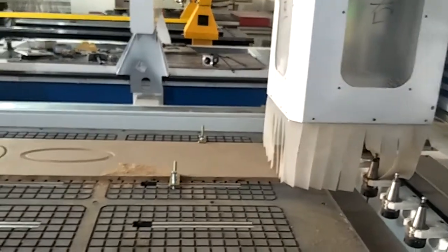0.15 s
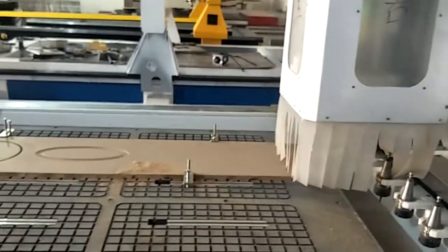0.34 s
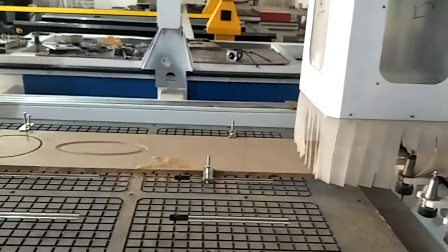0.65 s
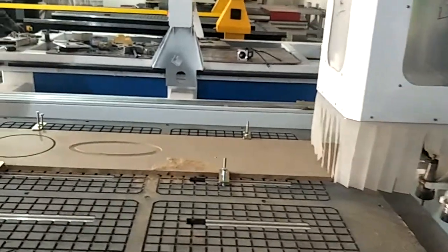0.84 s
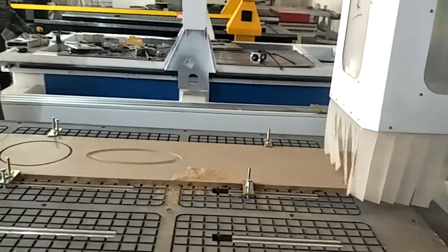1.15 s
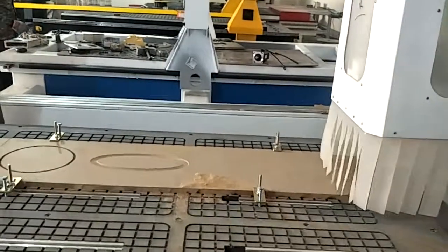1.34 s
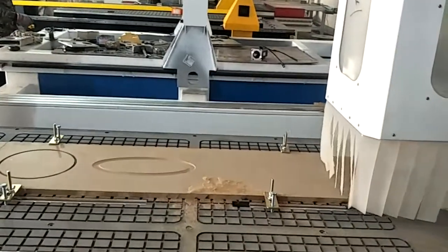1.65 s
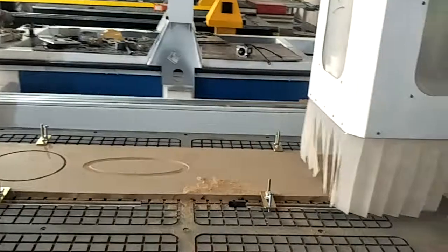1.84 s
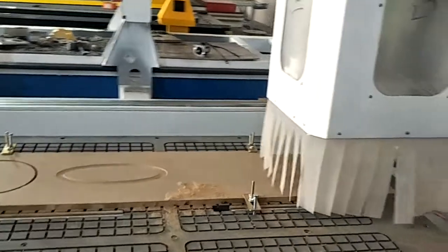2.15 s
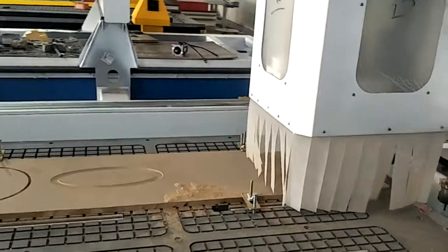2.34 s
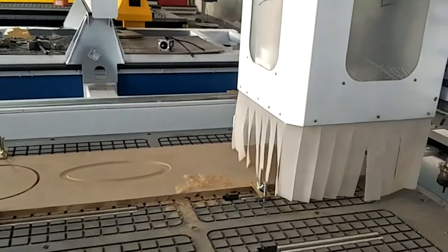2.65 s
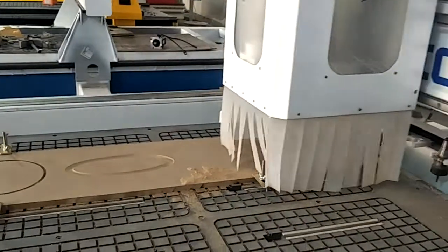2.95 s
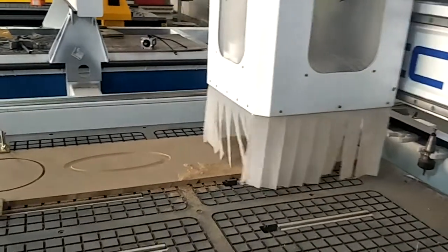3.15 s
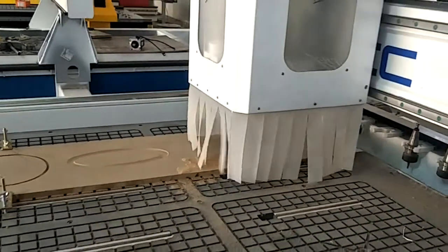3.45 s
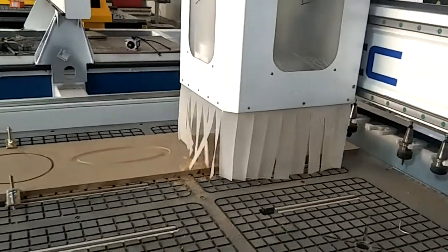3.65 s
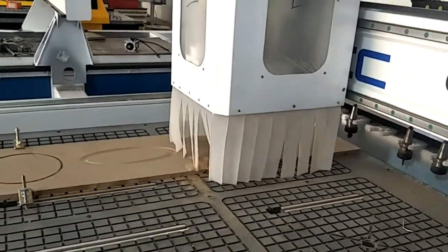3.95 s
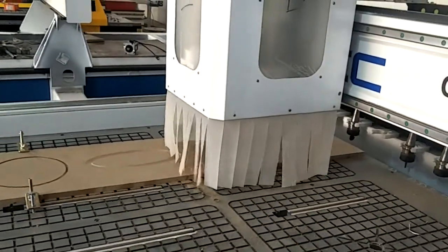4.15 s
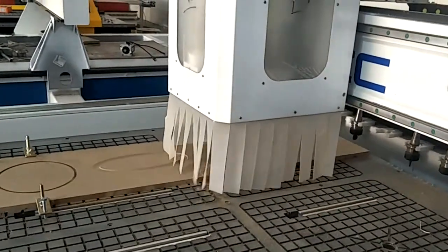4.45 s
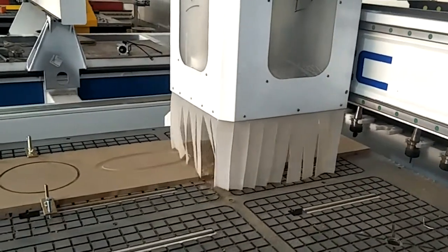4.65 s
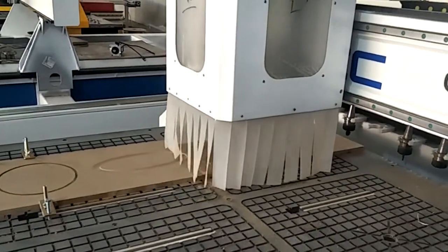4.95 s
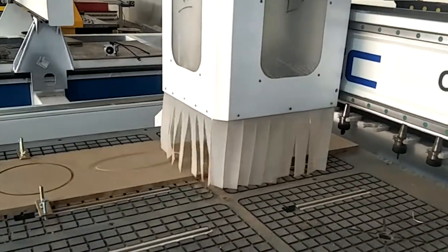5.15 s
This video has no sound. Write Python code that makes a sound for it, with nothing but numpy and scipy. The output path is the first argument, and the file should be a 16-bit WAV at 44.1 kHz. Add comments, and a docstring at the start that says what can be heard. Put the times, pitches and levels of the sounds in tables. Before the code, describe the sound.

From 0 s a router spindle is already running up in a reverberant workshop. A low hum climbs from about 140 to 285 Hz by 5.3 s, while a piercing, slightly gritty whine rises with it from about 4.5 to 9 kHz. Both swell and fade as they pass through resonances; the whine leans right in the later part. Drive electronics add a wavering tone sliding from 800 to 1400 Hz, steady after 2.5 s, a faint very high switching tone, and thin beat tones. Low rumble and airy bearing rush sit behind, the rumble fuller from about 2 s, with faint distant machine tones. At 2.9 to 3.1 s four quick gantry knocks clatter, the third with the hardest metallic clang. From 4.4 s a feed motor sings softly near 3.3 kHz, with dull thuds at 4.6, 4.8, 4.9 and a stronger one at 5.2 s. The spindle is still rising at the end.

```python
"""A hum and a piercing whine rise together as a router spindle runs up in a workshop.
The unbalanced shaft hums, 32 rotor slots whine, and both swell as they sweep through resonances.
The drive electronics add tones of their own and beat tones around the whine; air and machinery rush behind.
The hall answers spindle, beats and knocks with a different tail at each of two microphone ports.
Later the gantry knocks, and a feed motor sings as it creeps."""
import sys
import numpy as np
from scipy import signal
from scipy.io import wavfile
from scipy.ndimage import uniform_filter1d, map_coordinates

SR = 44100
rng = np.random.default_rng(int(sys.argv[2]) if len(sys.argv) > 2 else 0)


def store_wav(level_fs):
    """Save 16-bit WAV to argv[1]."""
    pcm = np.round(np.clip(np.atleast_2d(level_fs), -1, 1) * 32767)
    wavfile.write(sys.argv[1], SR, pcm.T.astype(np.int16))


def ratio(d):
    """dB to gain"""
    e = np.asarray(d, float) / 20
    return 10 ** e


N = 233465  # length in samples


def unit(x):
    """Normalisation: scales a signal to an rms of 1."""
    return x / np.sqrt(np.mean(x ** 2) + 1e-20)


def along(points, hz, order=1):
    """Spectral envelope: interpolates one column of (f/Hz, value, ..) on a logarithmic frequency axis."""
    columns = np.transpose(points)
    return np.interp(np.log(np.abs(hz) + 1), np.log(columns[0] + 1), columns[order])


def curves(rows):
    """Time envelope: one value per sample for each column after t/s."""
    s, *columns = np.transpose(rows)
    return [np.interp(np.arange(N) / SR, s, column) for column in columns]


def wobble(rate):
    """Band-limited random modulation: a spline through random knots, rate of them a second."""
    knots = rng.standard_normal(int(N * rate / SR) + 4)
    return map_coordinates(knots, [np.arange(N) * rate / SR])


def tone(hz, db, pan_db=0):
    """Frequency modulation: the phase of a sine integrates its frequency; db is rms, pan_db left over right."""
    cycles = np.cumsum(hz) / SR + rng.random()
    wave = np.sqrt(2) * ratio(db) * np.sin(2 * np.pi * cycles)
    return wave * ratio([[pan_db / 2], [-pan_db / 2]])


def peaks(rows, hz, order=2):
    """Modal superposition: steep resonances add with their phase, so neighbours cancel between peaks."""
    total = 0
    for row in rows:
        detuning = 1 + 2j * (hz - row[0]) / row[1]
        total = total + ratio(row[order]) / (detuning * np.abs(detuning))
    return np.abs(total)


# machine frame resonances: f/Hz, half-power width/Hz, level/dB (over the flat part, added as power)
FRAME_MODES = [(342.4, 26, 9), (428, 8.3, 7), (547, 29, -2.5), (795, 55, 9.5), (964, 43, 0), (1962, 12, 5),
               (2117, 76, 2.5)]


def frame(hz):
    """Structural resonance: a flat gain with the power of each frame mode added on top."""
    power = sum(ratio(db) ** 2 / (1 + (2 * (hz - centre) / width) ** 2) for centre, width, db in FRAME_MODES)
    return np.sqrt(1 + power)


# run-up of the shaft: t/s, f/Hz (turns a second)
SHAFT_SPEED = [(0.0, 141.4), (0.18, 149.1), (0.6, 166.7), (1.12, 185.8), (1.4, 194.5), (1.68, 202.3),
               (2.18, 213.4), (2.6, 221.3), (3.7, 242.3), (4.2, 254), (4.7, 266.4), (5.0, 274.8),
               (5.29, 284.4)]
# standing waves of the workshop that the hum sweeps through: f/Hz, width/Hz (at -6 dB), level/dB
ROOM_MODES = [(145.8, 3.8, -25), (165.3, 7, -17), (177, 2.6, -29), (173.3, 6.2, -10.5), (179.4, 3.6, -13),
              (184.85, 6.1, -10.5), (190.4, 4.4, -17.5), (200.3, 5.5, -16.5), (206.14, 7.6, -11),
              (212, 8, -17.5), (225.94, 7.3, -13), (232.2, 4.45, -20), (237.9, 6.5, -17),
              (254.25, 10.2, -17), (269.94, 7.4, -16.5), (281.5, 12, -23.5)]
# bearing seat resonances: f/Hz, width/Hz (at -6 dB), level/dB
SEAT_MODES = [(1700, 340, -64), (1913, 38, -37), (2010, 34, -39.5), (2040, 55, -33.5), (2123, 39, -27.5),
              (2252, 25, -32), (2330, 130, -42), (2500, 34, -36.5), (2596, 40, -36.5)]
# shaft orders: multiples of the shaft speed
ORDERS = [.42, 2, 3, 3.999]
# the same orders: level/dB (before frame and wobble)
ORDER_LEVELS = [-45, -45.5, -50.5, -49.5]
# housing resonances that the slot whine sweeps through: f/Hz, width/Hz (at -6 dB), left level/dB, right level/dB
SHELL_MODES = [(4553, 160, -17.5, -16), (4793, 93, -20.5, -22.5), (4952, 79, -24, -13.5),
               (5110, 84, -14, -17.5), (5394, 90, -30, -15.5), (5627, 210, -23.5, -17),
               (5910, 270, -31.5, -22), (6260, 630, -29.5, -26), (6660, 170, -32.5, -22.5),
               (6827, 67, -33.5, -16), (6913, 28, -29.5, -12.5), (7024, 82, -36, -19.5),
               (7240, 344, -30.5, -21), (7690, 160, -39.5, -26), (7990, 330, -30, -24.5),
               (8214, 144, -33.5, -22.5), (8428, 215, -26, -20.5), (8610, 120, -33.5, -31),
               (8870, 230, -33, -27), (9070, 25, -35.5, -32.5)]
SLOTS, BEARING = 32, 9.3  # cycles per turn
HISS_DB, HISS_HZ = -21.5, 1105  # nominal depth under the whine and spread to either side


def spindle():
    """Order analysis: hum, shaft orders, bearing tone and slot whine are multiples of one shaft speed."""
    shaft, = curves(SHAFT_SPEED)
    hum = peaks(ROOM_MODES, shaft) * tone(shaft, 0, pan_db=0.8)
    bearing = peaks(SEAT_MODES, BEARING * shaft) * tone(BEARING * shaft, 0, pan_db=3.0)
    orders = 0
    for multiple, db in zip(ORDERS, ORDER_LEVELS):
        orders = orders + frame(multiple * shaft) * tone(multiple * shaft, db + 4 * wobble(8))
    slot_hz = SLOTS * shaft
    reach = np.array([peaks(SHELL_MODES, slot_hz), peaks(SHELL_MODES, slot_hz, order=3)])  # left, right
    hiss = ratio(HISS_DB) * wobble(2 * HISS_HZ)  # modulation spreads noise around the whine
    whine = reach * tone(slot_hz, 0) * (1 + hiss)
    return hum + bearing + orders + whine


# drive tone that ramps up and holds: t/s, f/Hz
DRIVE_PITCH = [(0.0, 801), (0.93, 1030), (2.55, 1400), (5.29, 1399)]
# switching tone of the drive: t/s, f/Hz
SWITCH_PITCH = [(0, 11020), (.45, 11195), (1.45, 11574), (2.25, 11838), (2.55, 11929), (5.29, 11929)]
# levels before any wobble: t/s, drive tone level/dB, whine + drive level/dB, switching tone level/dB
TONE_LEVELS = [(0.0, -35.5, -34, -68), (0.6, -35, -31.5, -56), (1.2, -41, -46.5, -59), (1.8, -34, -45, -48),
               (2.6, -34.5, -37.5, -47.5), (3.3, -41, -47, -51), (3.75, -39.5, -49.5, -48),
               (4.0, -31.5, -44.5, -48), (4.45, -33.5, -44.5, -48), (4.7, -37, -46, -48),
               (5.29, -33, -39, -50)]
# weak beats: multiples of whine, drive tone, switching tone, rectifier ripple [1]
BEAT_ORDERS = [(1, -1, 0, 0), (1, 0, 0, 1), (1, 0, 0, -1), (1, 0, 0, 2), (1, 0, 0, -2), (-1, 0, 1, 0),
               (2, 1, 0, 0), (2, 0, 0, 0), (2, -1, 0, 0), (3, 0, 0, 0), (3, -1, 0, 0)]
# the same beats: level/dB (before housing and wobble), left over right/dB
BEAT_LEVELS = [(-48, -10), (-50.5, -13), (-41, -7), (-57.5, 11), (-62.5, -7.5), (-51.5, 0.5), (-51, 0),
               (-58, 7.5), (-60.5, -3), (-63, 12.5), (-61, -5)]
# how well the housing radiates the beats: f/Hz, level/dB
HOUSING_GAIN = [(3500, 4.5), (4500, -4.5), (5000, 1.5), (5600, -2), (7000, -5.5), (9000, -4), (10300, -5.5),
                (11600, 3.5), (13500, 1.5), (15700, -3.5)]
RIPPLE_HZ = 300


def drive():
    """Intermodulation: in the magnetic field the drive's tones beat with the slot whine at sums and differences."""
    whine = SLOTS * curves(SHAFT_SPEED)[0]
    (drive_hz,), (switch_hz,) = curves(DRIVE_PITCH), curves(SWITCH_PITCH)
    _, upper_db, _ = curves(TONE_LEVELS)
    sound = tone(whine + drive_hz, upper_db, pan_db=-7.5)
    for (a, b, c, d), (db, pan_db) in zip(BEAT_ORDERS, BEAT_LEVELS):
        beat = a * whine + b * drive_hz + c * switch_hz + d * RIPPLE_HZ
        audible = beat < .45 * SR  # silent near the Nyquist limit
        level = db + along(HOUSING_GAIN, beat) + 3.43 * wobble(14)
        sound = sound + audible * tone(beat, level, pan_db)
    return sound


def cabinet():
    """Interaural-type delay: the wavering drive and switching tones come from the side, right port later."""
    drive_db, _, switch_db = curves(TONE_LEVELS)
    base = tone(curves(DRIVE_PITCH)[0], drive_db + 2.5 * wobble(14), pan_db=4.0)
    switching = tone(curves(SWITCH_PITCH)[0], switch_db + 4 * wobble(5.99), pan_db=4)
    left, right = base + switching
    return np.array([left, np.roll(right, 10)])  # samples


# likeness of left and right noise: f/Hz, correlation [1]
LIKENESS = [(60, 0.9), (240, 1), (950, 0.27), (3770, 0.057), (15000, 0.04)]


def rush(gain, patchy_db):
    """Partial coherence: noise of rms 1, less alike left and right by frequency, in patches of random gain."""
    hz, _, z = signal.stft(rng.standard_normal((2, N + SR)), SR, nperseg=4096)
    field = uniform_filter1d(rng.standard_normal(z.shape[1:]), 20, 0)
    field = uniform_filter1d(field, 2, 1)
    turn = np.arccos(np.clip(along(LIKENESS, hz), -1, 1))[:, None] / 2  # splits power into mid and side
    z = z * gain(hz)[:, None] * ratio(patchy_db * unit(field))
    mid, side = signal.istft(z * [np.cos(turn), np.sin(turn)], nperseg=4096)[1][:, :N]
    return unit(np.array([mid + side, mid - side]))


# course of the background: t/s, rumble level/dB, rush level/dB (each relative, offset below)
SHOP_LEVELS = [(0.0, -41.5, -41), (0.13, -41, -43.5), (2.19, -32, -41), (2.75, -34, -40), (3.08, -34, -36),
               (3.3, -36.5, -42.5), (4.45, -35.5, -42), (4.75, -32.5, -38), (5.29, -39.5, -39)]
# spectrum of the rumble: f/Hz, relative level/dB
RUMBLE_SPECTRUM = [(25, -27.5), (50, -16.5), (80, -7), (110, -1.5), (170, -0.5), (260, -3), (400, -22),
                   (600, -53.5)]
# spectrum of the rush before the frame colours it: f/Hz, relative level/dB
RUSH_SPECTRUM = [(150, -20.5), (300, -7), (700, -5), (1200, -8.5), (1700, -9.5), (2300, -9), (3000, -14.5),
                 (4400, -19), (5200, -31.5), (6500, -30.5), (8000, -66), (15500, -90.5)]


def shop():
    """Filtered broadband noise: low rumble, and the rush of air and bearings coloured by the frame."""
    rumble_db, rush_db = curves(SHOP_LEVELS)
    rumble = rush(lambda hz: ratio(along(RUMBLE_SPECTRUM, hz)), patchy_db=2.0)
    air = rush(lambda hz: ratio(along(RUSH_SPECTRUM, hz)) * frame(hz) ** 0.79, patchy_db=1.5)
    return ratio(rumble_db + 5.0) * rumble + ratio(rush_db + 13) * air


# tones of machinery further off, before their wobble: f/Hz, level/dB
FAR_TONES = [(1505, -50), (2005, -47)]


def far_machines():
    """Narrow-band modulation: distant tones keep their place while pitch and level waver."""
    return sum(tone(hz + 4 * wobble(6), db + 5 * wobble(7)) for hz, db in FAR_TONES)


# reverberation: f/Hz, t60/s, relative level/dB
HALL_DECAY = [(148, 1, -20), (597, 0.73, 0), (1980, 0.56, -2.5), (5700, 0.45, -1.5), (12000, 0.26, 1.5)]


def hall(x):
    """Diffuse reverberation: noise decays at its own rate per frequency, with a separate tail at each port."""
    hz, t, z = signal.stft(rng.standard_normal((2, SR)), SR, nperseg=256)
    t60 = np.abs(along(HALL_DECAY, hz))[:, None]
    level = along(HALL_DECAY, hz, order=2)[:, None]
    decay = ratio(level - 60 * t / t60) / np.sqrt(t60 * SR / np.log(1e6))  # evens out the energy of long tails
    tail = signal.istft(z * decay, SR, nperseg=256)[1]
    delayed = np.pad(x, ((0, 0), (300, 0)))  # samples
    return signal.fftconvolve(delayed, tail, axes=1)[:, :N]


# gantry knocks: t/s, overall level/dB, clang level/dB, thud level/dB (all relative)
KNOCK_TIMES = [(2.885, -15.5, -24, -5), (2.958, -20.5, -20, -14), (3.029, -14, -9, -8),
               (3.071, -17.5, -12, -18), (4.623, -30, -18, 10), (4.787, -35.5, -12, 7),
               (4.922, -32.5, -18, 23), (5.185, -19.5, -25, 16)]
# modes of the body, the first being the thud: f/Hz, relative level/dB, t60/s
BODY_MODES = [(148.6, 0, 0.13), (357, 8.5, 0.095), (577, -2, 0.43), (927.5, -1.5, 0.26), (1124, -6, 0.075)]
# modes of the steel: f/Hz, relative level/dB, t60/s
STEEL_MODES = [(1520, -2, 0.1), (2148, -2, 0.14), (2970, 7, 0.3), (3270, -4, .1), (3880, 13, 0.08)]


def knocks():
    """Impact excitation: each knock rings decaying modes over a low thud, a dull shake and a short rattle."""
    out, t = np.zeros(N + SR), np.arange(SR // 3) / SR

    def ring(modes):
        """Modal decay: damped sines, each struck at a new random strength."""
        total = 0
        for hz, db, t60 in modes:
            total = total + ratio(db + rng.normal(0, 1.9) - 60 * t / t60) * np.sin(2 * np.pi * hz * t)
        return total

    def dull(hz):
        """Low-pass filtering: noise without its treble."""
        return signal.sosfilt(signal.butter(6, hz, fs=SR, output="sos"), rng.standard_normal(len(t)))

    for s, db, clang_db, thud_db in KNOCK_TIMES:
        rattle = ratio(17 - 60 * t / .05) * dull(4300)
        shake = ratio(10 - 60 * t / .12) * dull(1300)
        thud = ratio(thud_db) * ring(BODY_MODES[:1])
        clang = ratio(clang_db) * (ring(STEEL_MODES) + rattle)
        blow = thud + ring(BODY_MODES[1:]) + shake + clang
        onset = 1 - np.exp(-t / 0.001)
        out[round(s * SR):][:len(t)] += ratio(db - 9) * blow * onset
    return out[:N] * np.ones((2, 1))


def feed():
    """Amplitude envelope: the wavering song of a feed motor fades in once the gantry creeps."""
    start_s, rise_s = 4.4, .5
    rise = np.clip((np.arange(N) / SR - start_s) / rise_s, 0, 1)
    return rise * tone(3330 + 6 * wobble(10), -42 + 3 * wobble(25))


def scene():
    """Superposition: the machine reaches the left port a little later, and the hall adds its answer."""
    left, right = spindle() + drive() + knocks()
    near = np.array([np.roll(left, 5), right])  # samples
    fade_in = np.clip(np.arange(N) / (.02 * SR), 0, 1)  # lets the hall fill softly
    return near + hall(near * fade_in) + cabinet() + far_machines() + feed() + shop()


def roll_off(x):
    """The treble ends steeply here."""
    return signal.sosfilt(signal.butter(12, 15810, fs=SR, output="sos"), x)


def record(dry):
    """Linear superposition is complete: the finished mix goes out at its own level."""
    return roll_off(dry)


dry = scene()
out = record(dry)
store_wav(out)
```